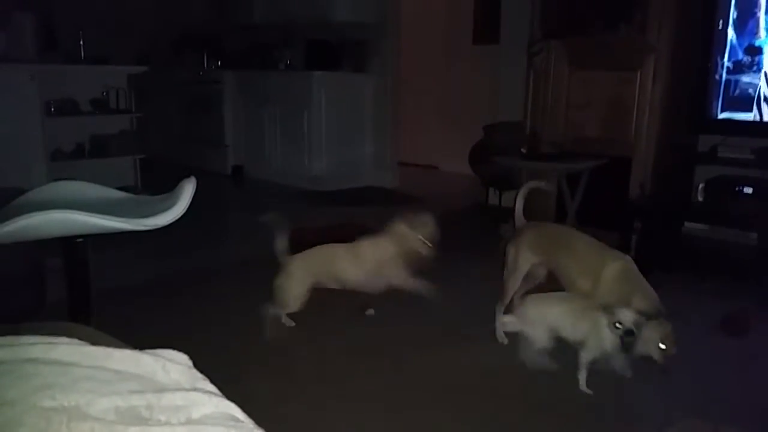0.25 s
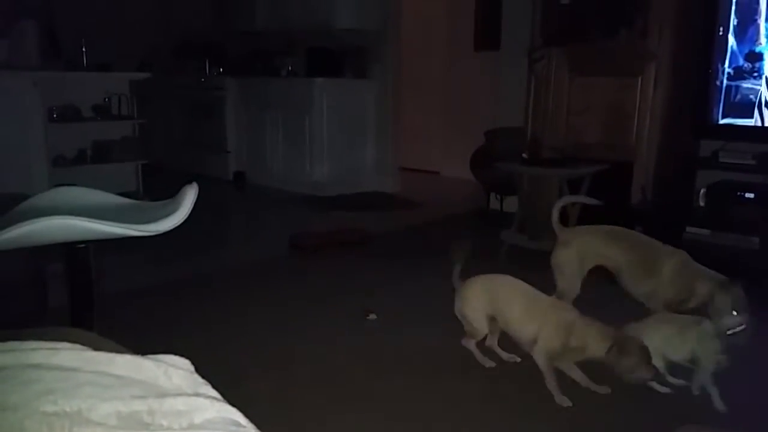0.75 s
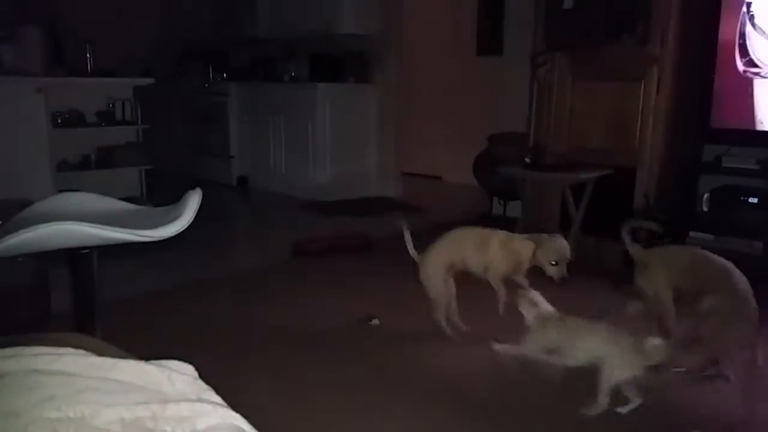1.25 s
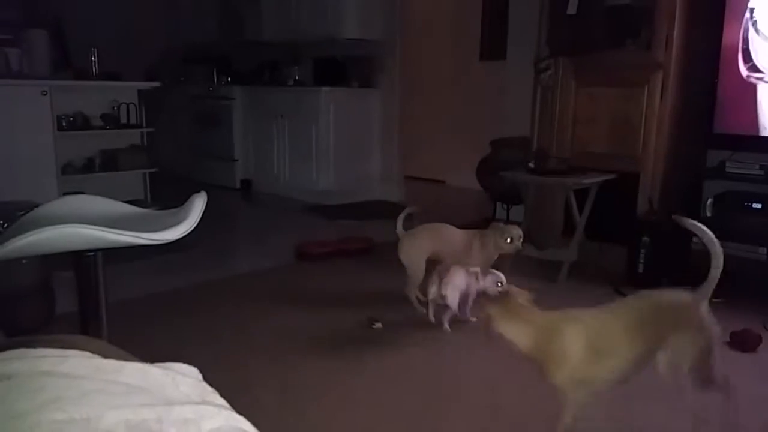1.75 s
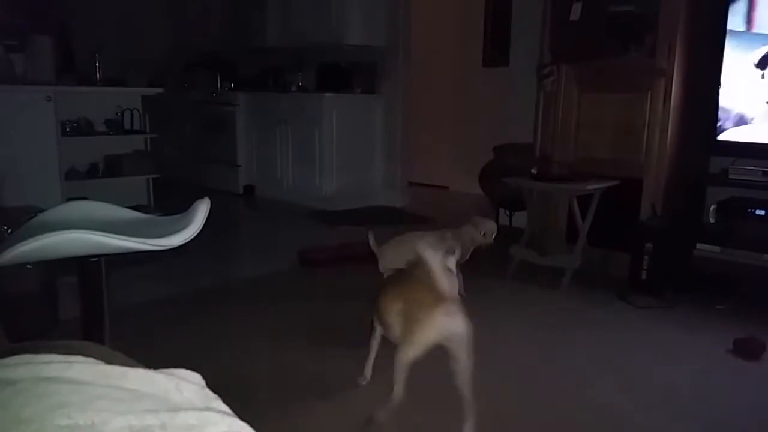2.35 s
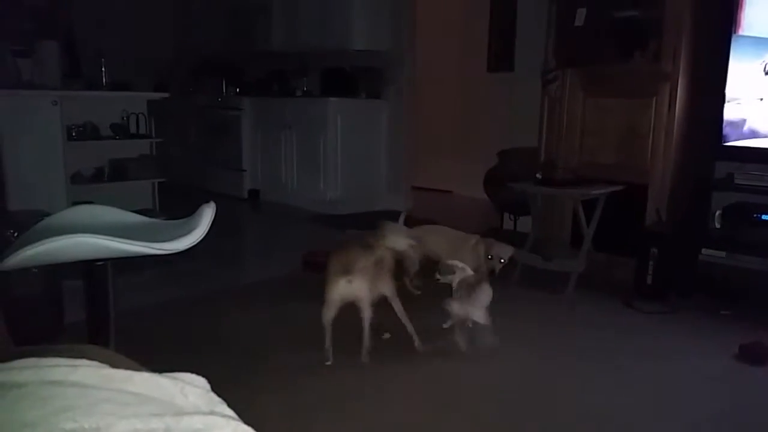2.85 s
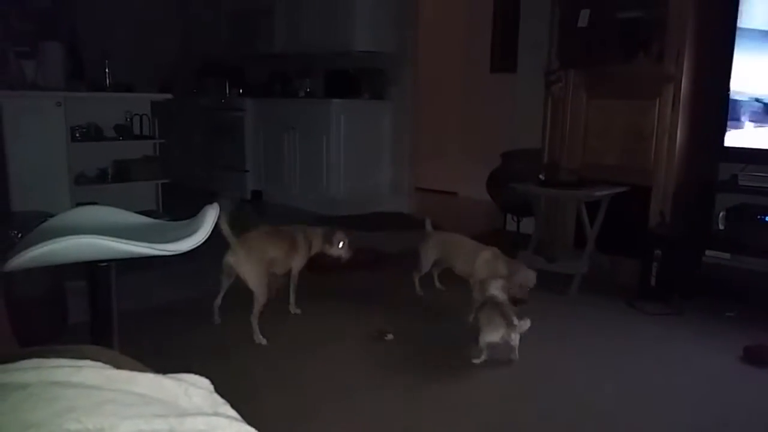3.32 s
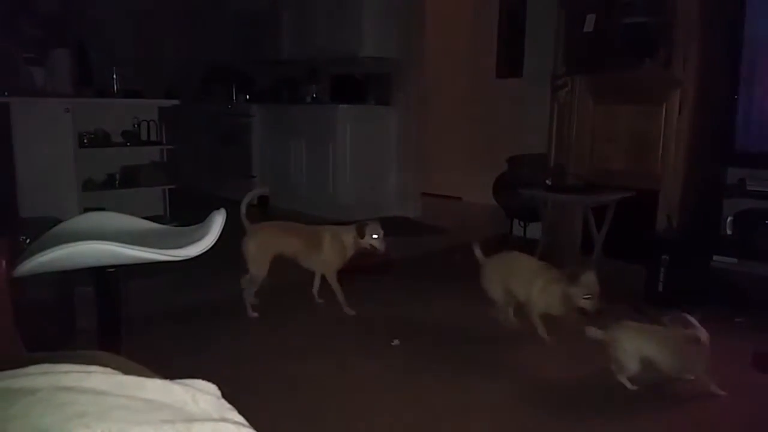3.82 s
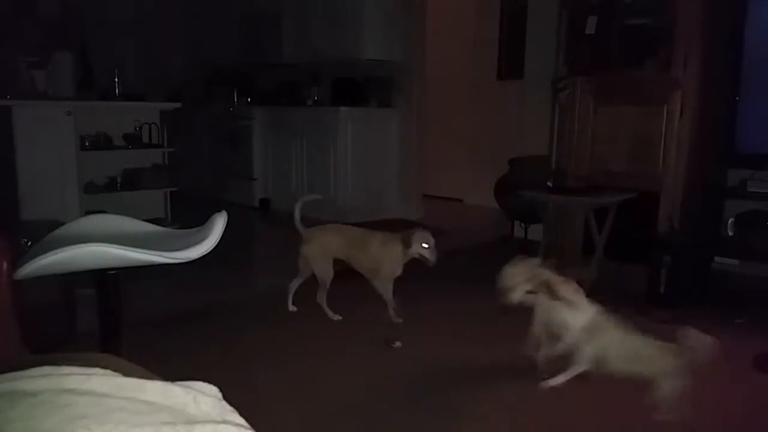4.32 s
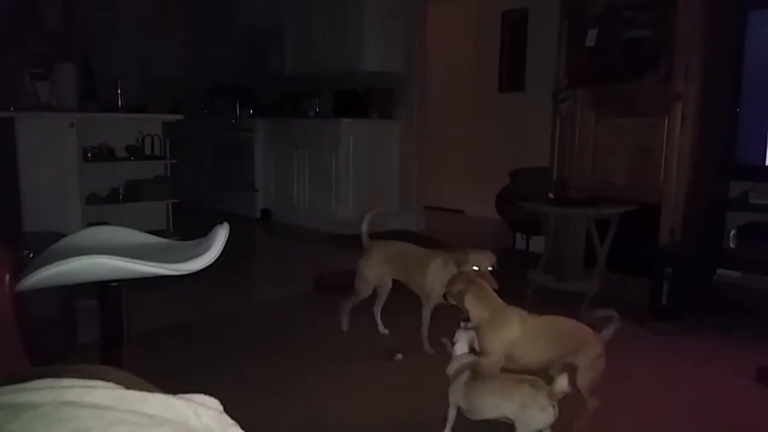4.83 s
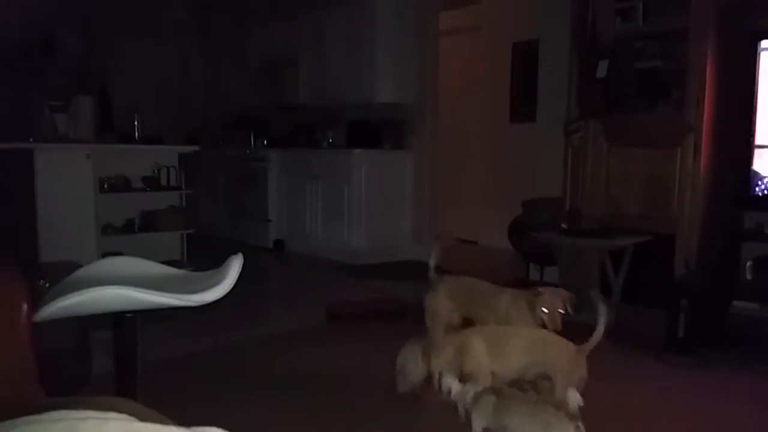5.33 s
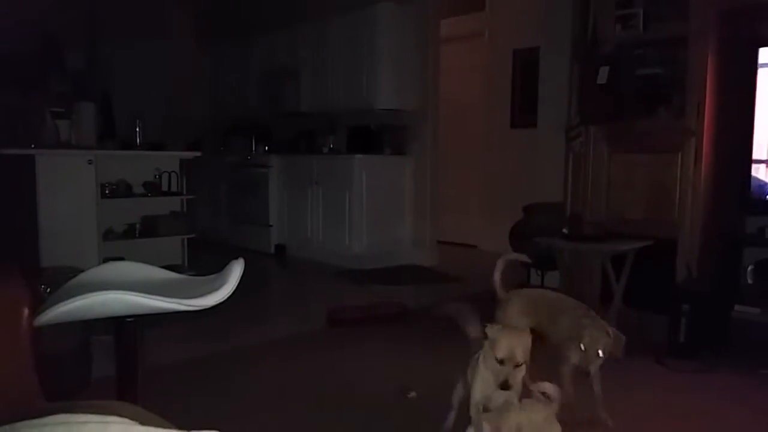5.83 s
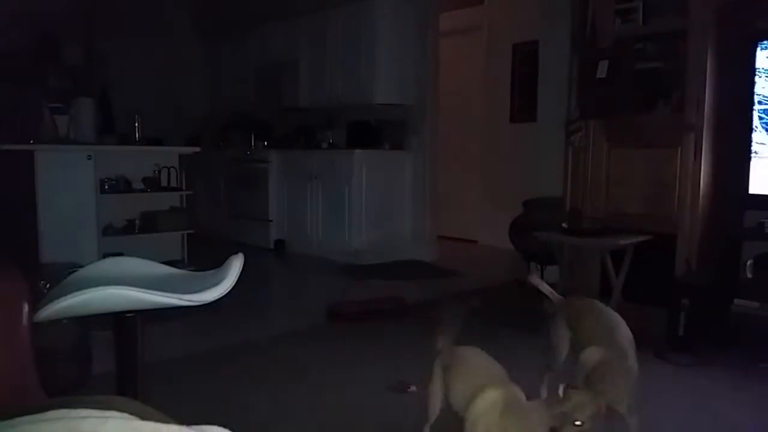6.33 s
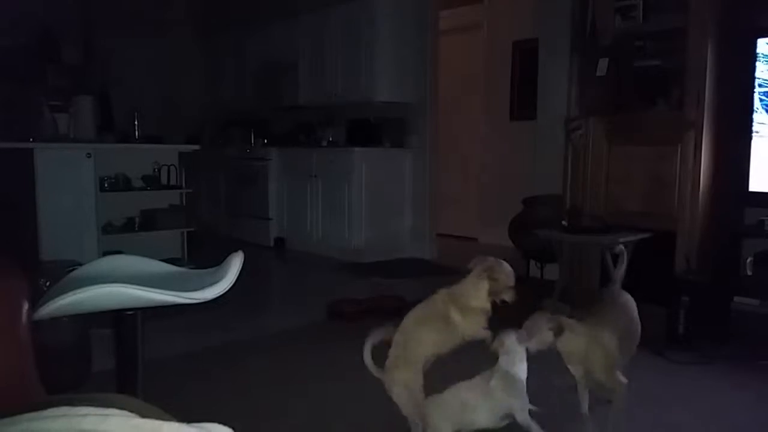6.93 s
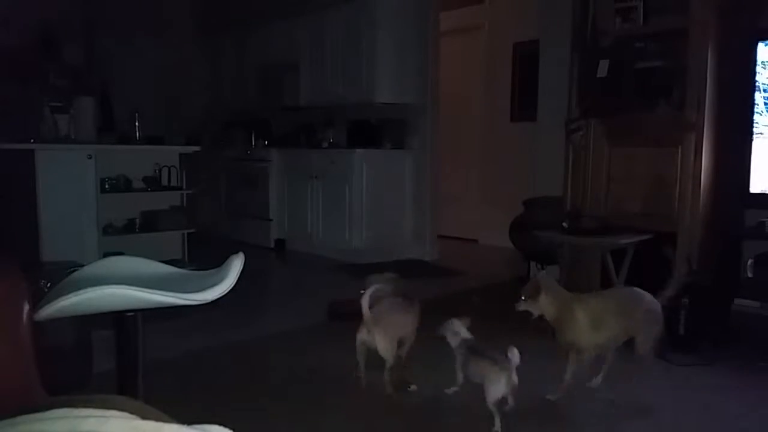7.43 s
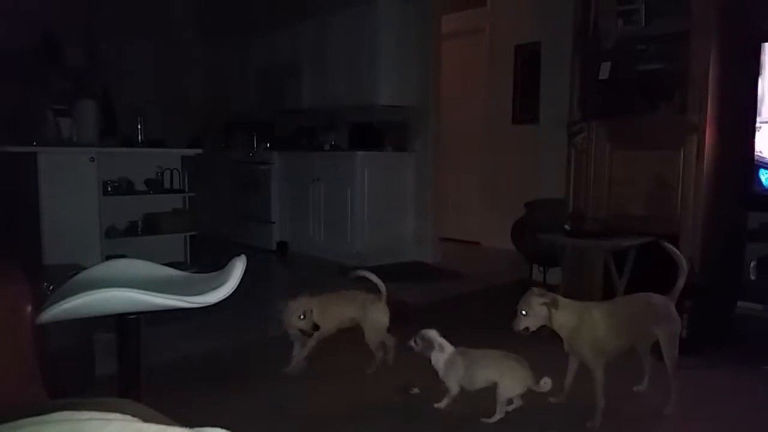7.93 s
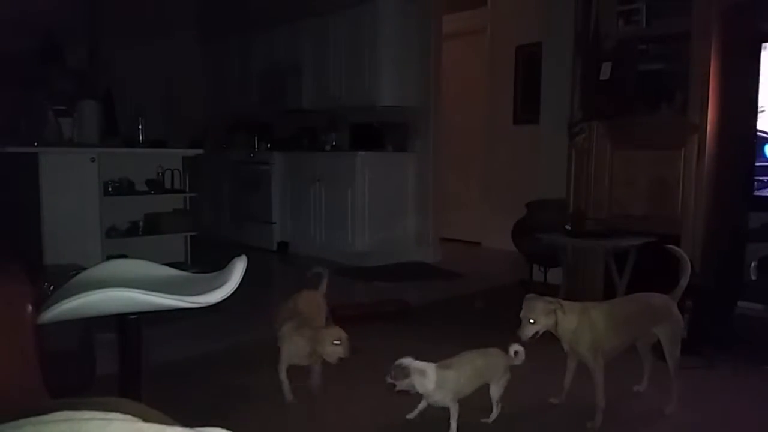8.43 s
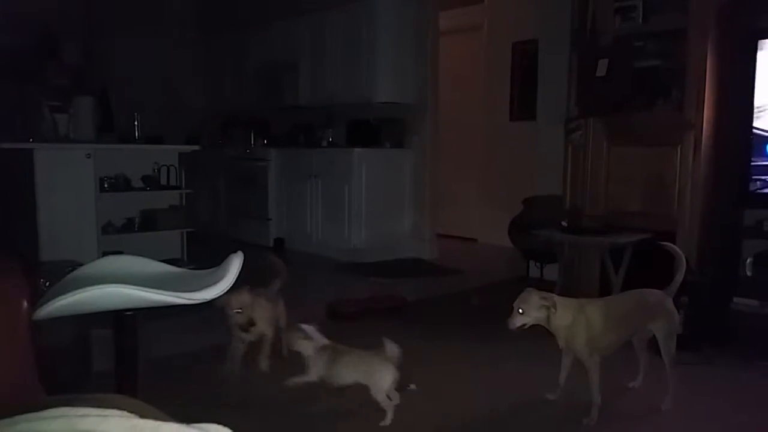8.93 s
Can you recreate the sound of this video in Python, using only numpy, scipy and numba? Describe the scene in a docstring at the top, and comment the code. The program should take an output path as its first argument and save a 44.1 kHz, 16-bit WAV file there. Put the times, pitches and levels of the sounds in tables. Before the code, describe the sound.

Dogs wrestle a few metres from a phone in a reverberant living room, slightly to its right. A sharp bark opens over quick, raspy growls; two hoarse barks come near three seconds, the second very loud. Growling grumbles, huffs and soft floor thumps follow, then a bark with a short high yelp, and a last loud bark near the end. Low room rumble throughout.

```python
"""Small dogs wrestling on a carpet

A living room with a ringing echo; the dogs play a few metres from a phone, to the right of its microphone.
Growls are uneven throat pulses plus a chest tone; hoarse barks swell from grunts, and one dog yelps.
Noise puffs make the huffs, sine tones the whines, damped knocks the thumps; ticks and squeaks come between.
The house rumbles low. The phone's gain control squeezes the loudest barks and stays low for a moment after.
"""
import sys
import numpy as np
from scipy import signal
from scipy.fft import rfft, irfft, next_fast_len
from scipy.io import wavfile
from scipy.ndimage import uniform_filter1d, minimum_filter1d
from numba import njit

SR = 44100
rng = np.random.default_rng(int(sys.argv[2]) if len(sys.argv) > 2 else 0)


def unload_audio(sound):
    """Save the sound as a 16-bit wav file, at the path given as the first command line argument."""
    columns = np.transpose(np.atleast_2d(sound))
    # keep every value between -1 and 1, then stretch to whole-number steps
    steps = np.round(np.clip(columns, -1, 1) * 32767)
    wavfile.write(sys.argv[1], SR, steps.astype(np.int16))


N = 404305
T = np.arange(N) / SR  # seconds

# All source levels are relative, ahead of room, microphone and gain control.
# Pushes of the growl. Each row: start in seconds, length in seconds, pitch in Hz, base level in dB,
# chest tone against the base in dB, mouth opening 0-1, bared teeth in dB, tongue as a factor on the mouth
# resonances, lips as a factor on the teeth resonances, rasp 0-1.
GROWLS = [(0.0, 0.039, 171.2, -35, -1.5, .8, -35, 1, 0.72, 1),
          (.05, 0.18, 163.3, -39.5, -2.5, 0.9, -25, .98, 0.97, .4),
          (.264, 0.099, 168, -38, -4, 0.79, -30.5, 1.2, 1, 0.26),
          (.375, 0.076, 168, -34.5, -1, 0.49, -38.5, 0.95, 1.43, 0.2),
          (.445, 0.044, 171.4, -35.5, -4, 0.61, -30, 1.05, 0.8, 0.6),
          (.5, .1, 165, -37, 2, 0.34, -46, 1.17, 1.5, 0.6),
          (.61, 0.054, 164.4, -37.5, -8, 0.76, -33, 1.12, 0.99, 0.3),
          (0.656, .105, 168, -35, 1, 0.92, -28, 1.05, 1.03, .5),
          (.765, 0.089, 180, -26.5, -7.5, 0.75, -22.5, 0.95, 1.03, 0.41),
          (.823, 0.086, 197.8, -26.5, -1, 0.95, -33, 1.127, 1, 0.78),
          (.905, 0.1, 172.2, -44, -6, .92, -46, 0.8, 0.79, .3),
          (1.083, 0.069, 144.6, -35, 4.5, 0.73, -30.5, 1.17, 1.08, 0),
          (1.194, 0.076, 142.9, -37, 1, 0.33, -44, 1.44, 1.4, 0.82),
          (1.459, 0.06, 141.2, -36.5, -2, 0.75, -33, 1.01, 1.3, 0.66),
          (1.501, .13, 140.8, -32.5, 4.5, 0.35, -39.5, 0.95, 1.4, 0.94),
          (1.634, 0.098, 134.9, -33, -5.5, 0.15, -36, 1.08, 1.39, 0.37),
          (2.54, 0.18, 118.1, -38.5, -3.5, 0.1, -46, 0.92, 1.34, 0.76),
          (3.458, 0.18, 136.7, -35, -5.5, 0, -59, 0.84, 1.3, 0.47),
          (4.096, 0.17, 138.3, -45.5, .5, 0.5, -46.5, 1.23, 1.3, 0.35),
          (4.225, 0.15, 150.5, -47.5, 8, 0.8, -44, 1.04, 1.23, 0.14),
          (4.345, .11, 157.3, -41, 1.5, 0.9, -44, 1.135, 1.36, 0.07),
          (4.48, 0.11, 154.2, -36, 5, 0.43, -63, 1.21, 1.1, 0.29),
          (4.614, .13, 171, -30, -2.5, 0.19, -45, 1.11, 1.2, 0.3),
          (5.075, .14, 160.6, -37.5, 6.5, 0.64, -35, 1.2, 1.12, 0.74),
          (5.21, .16, 166.5, -36, 3, 0.47, -35.5, 1.204, 1.054, .9),
          (5.331, 0.096, 172.4, -32, 1.5, 0.42, -35, 1.18, 1.3, 0.91),
          (5.421, 0.093, 168.3, -30, 2.5, 0.17, -36.5, 1.1, 1.28, 0.97),
          (5.526, 0.1, 153, -37, 1, 0.32, -46, 1.27, 1.43, 0.83),
          (6.432, 0.044, 144.2, -35, 1, 0.24, -44, 1.05, 0.92, 0.76),
          (6.543, 0.15, 165.4, -37.5, 0, 0.28, -37.5, 1.01, 1.34, 0.69),
          (6.676, 0.11, 163.1, -32, 0, 0.13, -36.5, 0.96, 1.14, 0.51),
          (6.942, 0.05, 164, -29, -5, 0.62, -35, .92, 1.8, 0.4),
          (6.997, 0.19, 153.1, -36.5, 7, 0.23, -61, .974, 0.78, 0),
          (7.231, 0.059, 122.2, -32.5, -7.5, 0.2, -41, 0.99, 0.82, 0.6),
          (7.453, .17, 152.8, -32.5, 1.5, 0.15, -42, 1.08, 1.28, 0.48),
          (7.654, 0.07, 122.6, -42.5, -2, 0.23, -50, 0.98, 1.07, 0.55),
          (9, 0.2, 141, -38, -1.5, 0.35, -44.5, 0.92, 1.06, .4)]
# Barks. Each row: time in seconds (the grunt leads it), length in seconds, level in dB, pitch in Hz and jaw
# resonance in Hz with the jaw wide open, teeth in dB, lips as a factor on the teeth resonances,
# opening grunt against the bark in dB, roughness 0-1, escaping air in dB.
BARKS = [(0.035, 0.049, -2.5, 454.8, 970, -6, 0.94, -20.5, 0.87, -35.5),
         (0.067, 0.044, -14, 342.6, 1050, 6, 0.84, -26, 0.73, -52),
         (2.746, 0.1, -9.5, 287.6, 840, -2, 1.035, -13.5, 0.84, -41),
         (3.135, 0.077, 5, 336.3, 1075, 5.5, 1.028, -26, 0.84, -21),
         (6.812, 0.049, -9, 467.7, 940, -9, 0.913, -22, 0.5, -53.5),
         (8.5, 0.072, -0.5, 334.4, 1040, 8.5, 0.96, -23, .8, -30)]
# Jaw during a bark. Each row: seconds after the grunt begins, opening 0-1.
BARK_JAW = [(0, 0.38), (.038, 0.86), (.072, 0.97), (.092, 0.42), (.115, 0), (.16, 0.27)]
# Course of the yelp. Each row: time in seconds, pitch in Hz, level in dB, hoarseness 0-1.
YELP = [(6.824, 520, -23.5, 0.92), (6.851, 528.7, -13, 0.87), (6.872, 532.2, -16, 0.07),
        (6.896, 552.6, -9.5, 0.01), (6.917, 538.2, -12, .04), (6.933, 524, -14, 0.01),
        (6.955, 505, -20, 0.5)]
# Two whines through the nose, then two faint hums. Each row: start in seconds, length in seconds,
# level in dB, pitch in Hz, pitch bend as a share, third harmonic against the first in dB.
SOFT_TONES = [(0.241, 0.11, -34.5, 336, 0.051, -32), (4.887, 0.16, -43.5, 508, 0.079, -15),
              (7.556, 0.46, -43, 296.5, 0.00048, -32.5), (8.164, 0.23, -58, 294.4, 0.0026, -43)]
# Air squeaking through the teeth. Each row: start in seconds, length in seconds, resonance in Hz, level in dB.
SQUEAKS = [(0.617, 0.15, 2910, -35), (1.233, 0.033, 2570, -30.5), (1.264, 0.032, 2500, -36),
           (4.202, 0.2, 2270, -42.5), (4.558, 0.025, 2600, -29.5), (4.605, .14, 2210, -38.5),
           (5.278, 0.32, 2630, -41.5)]
# Voiceless puffs from the muzzles. Each row: peak in seconds, half width in seconds, hiss in dB, throat in dB.
HUFFS = [(0.47, 0.019, -61, -51), (1.268, 0.07, -49.5, -38), (1.618, 0.033, -51.5, -40.5),
         (1.75, 0.11, -51.5, -38.5), (2.083, 0.042, -46, -45), (3.52, .03, -57.5, -61),
         (4.572, 0.11, -49, -38.5), (5.778, 0.043, -53.5, -43), (6.264, 0.054, -61, -84),
         (6.592, 0.094, -49.5, -37), (7.03, 0.12, -75, -45.5), (7.305, 0.052, -58, -36),
         (7.822, 0.014, -61.5, -39), (7.9, 0.096, -55.5, -45.5)]
# Teeth and claws ticking. Each row: start in seconds, level in dB, ring of the jaws in dB.
TICKS = [(.241, -43, -25), (0.601, -44, -26), (4.568, -30, 4), (5.402, -47, 0), (5.425, -42.5, 3),
         (5.783, -39.5, 8), (7.803, -37, 14)]
# Paws and bumps on the floor. Each row: start in seconds, peak level in dB, contact time in seconds.
THUMPS = [(1.75, -31.5, 0.0028), (2.532, -39.5, 0.0008), (4.961, -29.5, .0013), (5.807, -34, 0.0033),
          (5.879, -30, 0.0024), (5.937, -31.5, 0.0011), (5.968, -46.5, .003), (6.011, -50, 0.0041),
          (6.086, -37, .0025), (6.22, -27.5, 0.0012), (6.303, -34.5, 0.0021)]
# Resonances of the muzzle, the last set for a bark. Each row: centre in Hz, width in Hz, level in dB.
THROAT_MODES = [(219.5, 87, 7), (350, 150, -6.5), (394, 58, -1.5)]
MOUTH_MODES = [(614, 165, -3), (780, 220, -2), (983, 172, 4.5), (1206, 480, -11.5)]
TEETH_MODES = [(1500, 400, -14.5), (1830, 280, 8.5), (2170, 620, -6), (2700, 380, -3.5), (3820, 130, -18.5)]
BARK_TEETH_MODES = [(1520, 320, -1), (1974, 280, 11.5), (2440, 460, 3), (2735, 336, 2), (3845, 720, -15),
                    (5500, 1800, -22)]
# Colour of the cry, of air at teeth and nostrils, of air in the throat, and of the house.
# Each row: frequency in Hz, gain in dB.
YELP_COLOUR = [(150, -45), (540, -15.5), (1080, -8), (1630, -1), (2170, -10), (2720, -10.5), (3300, -21),
               (3800, -29.5), (4300, -74), (9000, -59)]
HISS_COLOUR = [(1500, -17), (4000, -2), (6000, -2.5), (8000, -14.5), (10000, -1.5), (13000, -1),
               (15000, -15)]
THROAT_AIR_COLOUR = [(150, -16), (500, -5), (1000, -6.5), (2200, -3), (3000, -9.5), (4200, -13),
                     (6500, -25.5), (10000, -52)]
HUM_COLOUR = [(20, -29.5), (50, -22.5), (100, -4.5), (160, -10.5), (330, -7), (480, -17), (800, -21.5),
              (1500, -30.5), (2200, -21), (3000, -38.5), (4000, -23.5), (6000, -42.5), (12000, -44)]
# Reverberation of the room. Each row: frequency in Hz, time to fall by 60 dB in seconds.
ROOM_T60 = [(100, 0.4), (400, 0.77), (900, 0.7), (2500, 0.69), (6000, 0.66), (12000, 0.32)]
# Echo against direct sound. Each row: frequency in Hz, level in dB.
ROOM_WET = [(100, -28), (200, -7.5), (400, -7.5), (800, 5.5), (1500, 3.5), (5000, 7), (13000, 15.5)]
# Lean of the stereo picture, split between the ports in scene(). Each row: frequency in Hz, left over right in dB.
LEAN = [(30, -1.5), (70, -6), (140, -2.5), (280, -4.5), (600, -7.5), (1200, -7.5), (2500, -5.5), (4500, -7),
        (8000, -28.5), (12500, 1)]
# A dip in the treble. Each row: frequency in Hz, gain in dB.
TREBLE_DIP = [(20, 5.5), (6000, -5), (7200, -6), (8200, -13.5), (9500, 2.5), (20000, 12.5)]

# Growl
GROWL_ATTACK_SHARE, SHORTEST_ATTACK_S = 0.12, .022  # a long push builds up more slowly
GROWL_RELEASE_S, CHEST_RELEASE_S = 0.037, 0.041  # the chest tone lingers into the next push
PITCH_ARCH, SAG_HZ_PER_S = .05, 50  # pitch rises with the push and sinks as the breath runs out
MOUTH_SHUT_DB, MOUTH_OPEN_DB = -6, 15  # mouth resonances against the base level
GROWL_HISS_DB, GROWL_RUSH_DB = -32, -25  # drive of the escaping air against the mouth
FLAP_HZ, FLAP_DB = 35.6, 1.63  # mean rate and least swing of flapping lips and soft palate
# A rasping push damps the resonances, flaps harder and lets more air rush through the throat.
RASP_WIDEN, RASP_FLAP_DB, RASP_RUSH_DB = 0.7, 1, 6.5
# Mouth sound glides from this level to its full gain; after a pause it starts weaker and takes longer.
MOUTH_GLIDE_S, MOUTH_START_DB = 0.039, 1
PAUSE_S, FIRST_GLIDE_S, FIRST_START_DB = .05, 0.076, -15

# Bark
BARK_LEAD_S = .033  # the grunt begins ahead of the listed time
BARK_ATTACK_S, BARK_RELEASE_S, BARK_PUSH_POWER = 0.087, 0.025, 1.99  # the power also shortens the release
BARK_RASP_HZ, BARK_RASP_DB = 74.64, 6.5  # mean rate and swing of the flapping throat
BARK_RUSH_DB = -7.5  # rush in the throat against the hiss
BARK_SHUT_PITCH = .8  # share of the open pitch when the jaw is shut

SHUT_STRETCH = 0.794  # factor on the muzzle resonances when the jaw is shut
SQUEAK_WIDTH_HZ = 410
YELP_DIRECT_DB = -8.5  # the yelping dog faces the phone: more of its cry arrives without echo
HUM_DB = -47  # mean level ahead of the microphone
PORT_LAG_S = .00007  # the sound reaches the left port later
TOP_HZ = 14600  # steep cut above this


def growls():
    """A nearly pure chest tone; flapping folds ring the throat, and the mouth as it opens and lets air out."""
    out, t, last_end = np.zeros(N), np.arange(SR // 2) / SR, 0
    for start, length, hz, db, chest_db, opening, teeth_db, tongue, lips, rasp in GROWLS:
        along = np.clip(t / length, 0, 1)
        arch = 1 + PITCH_ARCH * (np.sin(np.pi * along) - 2 / np.pi)
        pitch = hz * arch - SAG_HZ_PER_S * length * (along - .5)
        buzz, phase = folds(pitch, jitter=.025 + .03 * rasp, shimmer_db=1.7 + 2 * rasp, air_share=.25)

        flap_hz = FLAP_HZ * (1 + .3 * wander(30, len(t)))
        flap = np.sin(2 * np.pi * np.cumsum(flap_hz) / SR)
        flutter = unit(undb((FLAP_DB + RASP_FLAP_DB * rasp) * flap))
        tone = unit(np.sin(2 * np.pi * phase) * undb(1.8 * wander(35, len(t))))

        # the jaw opens with each push and shifts as the dog mouths its playmate
        jaw = 0.26 + 0.42 * opening + .4 * np.sin(np.pi * along) + 0.21 * wander(16, len(t))
        mouth_gain = undb(db + MOUTH_SHUT_DB + (MOUTH_OPEN_DB - MOUTH_SHUT_DB) * opening)
        glide_s, start_db = MOUTH_GLIDE_S, MOUTH_START_DB
        if start - last_end > PAUSE_S:
            glide_s, start_db = FIRST_GLIDE_S, FIRST_START_DB
        glide = undb(start_db * np.clip(1 - t / glide_s, 0, 1))
        last_end = start + length

        widen = 1 + RASP_WIDEN * max(rasp, 0)
        throat = undb(db - 0.5) * unit(resonate(buzz, THROAT_MODES))
        mouth = mouth_gain * muzzle(buzz, MOUTH_MODES, jaw, tongue, np.sqrt(widen))
        teeth = undb(teeth_db - 2) * muzzle(buzz, TEETH_MODES, jaw, lips, widen)

        attack_s = max(GROWL_ATTACK_SHARE * length, SHORTEST_ATTACK_S)
        push = swell(t, attack_s, length, GROWL_RELEASE_S)
        rush = undb(GROWL_RUSH_DB + RASP_RUSH_DB * rasp) * push
        breath = mouth_gain * air(undb(GROWL_HISS_DB) * push, rush)
        chest = undb(db + chest_db + 2.95) * tone * swell(t, attack_s, length, CHEST_RELEASE_S)
        voice = push * flutter * (throat + glide * (mouth + teeth))
        add(out, start, chest + voice + glide * breath)
    return out


def barks():
    """A low grunt swells into a hoarse, rasping blast; pitch and resonances follow the jaw open and shut."""
    out, t = np.zeros(N), np.arange(SR // 3) / SR
    for start, length, db, hz, jaw_hz, teeth_db, lips, grunt_db, rough, air_db in BARKS:
        opening = np.interp(t, *np.transpose(BARK_JAW))
        pitch = hz * (BARK_SHUT_PITCH + (1 - BARK_SHUT_PITCH) * opening)
        buzz, _ = folds(pitch, jitter=.06 * rough, shimmer_db=4.5 * rough, air_share=.4 * rough)
        rasp_hz = BARK_RASP_HZ * (1 + 0.31 * wander(83.7, len(t)))
        buzz = buzz * undb(BARK_RASP_DB * np.sin(2 * np.pi * np.cumsum(rasp_hz) / SR))

        jaw = muzzle(buzz, [(jaw_hz, 120 + 190 * rough, 0)], opening)
        teeth = muzzle(buzz, BARK_TEETH_MODES, opening, lips) * undb(teeth_db)
        push = swell(t, BARK_ATTACK_S, BARK_LEAD_S + length, BARK_RELEASE_S) ** BARK_PUSH_POWER
        blast = (jaw - teeth * (0.18 + 0.59 * push)) * push  # brighter with effort
        breath = undb(air_db) * air(push, undb(BARK_RUSH_DB) * push)

        low, _ = folds(165 + 60 * opening, jitter=0.18, shimmer_db=1.0, air_share=0.17)
        grunt = unit(resonate(low, [(152, 79, 1.0), (274, 100, 1.8), (880, 900, -1.5)]))
        grunt = grunt * swell(t, 0.029, length * 1.2, 0.068)
        add(out, start - BARK_LEAD_S, undb(db) * (blast + undb(grunt_db) * grunt) + breath)
    return out


def yelp():
    """A high cry that starts as a hoarse screech, clears on a shallow arch of pitch and frays again."""
    s, hz, db, hoarse = np.transpose(YELP)
    hoarse = np.interp(T, s, hoarse)
    buzz, _ = folds(np.interp(T, s, hz), jitter=.007 + .04 * hoarse, shimmer_db=2, air_share=hoarse)
    level_db = np.interp(T, s, db, left=-200, right=-200)  # silent outside the cry
    return unit(colour(buzz, YELP_COLOUR)) * undb(level_db)


def soft_tones():
    """Thin, nearly pure tones with a rounded level and a slightly wavering pitch."""
    out = np.zeros(N)
    for start, length, db, hz, bend, third_db in SOFT_TONES:
        arch = np.sin(np.linspace(0, np.pi, int(length * SR)))
        pitch = hz * (1 + bend * (arch - .5 + 0.79 * wander(50, len(arch))))
        phase = 2 * np.pi * np.cumsum(pitch) / SR
        tone = np.sin(phase) + 0.047 * np.sin(2 * phase) + undb(third_db) * np.sin(3 * phase)
        add(out, start, undb(db) * np.sqrt(2 * np.abs(arch)) * tone)
    return out


def squeaks():
    """Air forced through the teeth rings one broad resonance for a moment."""
    out = np.zeros(N)
    for start, length, hz, db in SQUEAKS:
        puff = np.hanning(int(length * SR))
        ring = unit(resonate(rng.standard_normal(len(puff)), [(hz, SQUEAK_WIDTH_HZ, 0)]))
        add(out, start, undb(db) * puff * ring)
    return out


def huffs():
    """Short, rounded puffs of air from the muzzles."""
    hiss, throat = np.zeros(N), np.zeros(N)
    for peak, width, hiss_db, throat_db in HUFFS:
        puff = np.hanning(int(4 * width * SR))
        start = peak - len(puff) / SR / 2
        add(hiss, start, undb(hiss_db) * puff)
        add(throat, start, undb(throat_db) * puff)
    return air(hiss, throat)


def ticks():
    """Short, bright noise snaps; those of the teeth also ring the jaws."""
    out, t = np.zeros(N), np.arange(SR // 50) / SR
    for start, db, ring_db in TICKS:
        click = rng.standard_normal(len(t)) * np.exp(-t / 0.0013)
        snap = resonate(click, [(2200, 610, ring_db), (4840, 9100, -39), (12800, 3500, -5)])
        add(out, start, undb(db) * snap / np.abs(snap).max())
    return out


def thumps():
    """Dull, heavily damped knocks of the floor; a soft paw pushes for longer and sounds duller."""
    out, t = np.zeros(N), np.arange(SR // 16) / SR
    for start, db, contact_s in THUMPS:
        push = -np.sin(np.pi * np.clip(t / contact_s, 0, 1)) ** 2
        knock = resonate(push, [(130, 143, 9.0), (293, 800, -7), (900, 1400, -5)])
        add(out, start, undb(db) * knock / np.abs(knock).max())
    return out


def room(x):
    """Direct sound, dense early echoes from floor and furniture, and a tail that differs at each port."""
    t = np.arange(int(.8 * SR)) / SR
    hz = np.fft.rfftfreq(len(t), 1 / SR)
    noise, echo = rfft(rng.standard_normal((2, len(t)))), 0
    for k, (_, t60) in enumerate(ROOM_T60):
        # each band fades out towards its neighbours
        band = on_log_axis([(f, j == k) for j, (f, _) in enumerate(ROOM_T60)], hz)
        tail, early = np.exp(-np.log(1000) * t / t60), 5.53 * np.exp(-t / 0.0035)
        decay = (tail + early) * (t > .002)
        echo = echo + irfft(noise * band, len(t)) * decay / np.sqrt(np.sum(decay ** 2))
    wet = signal.fftconvolve(colour(x, ROOM_WET)[None], echo, axes=1)[:, :N]
    # take back the colour that the added echo energy gives
    total = [(f, 10 * np.log10(1 + undb(db) ** 2)) for f, db in ROOM_WET]
    return colour(x + wet, total, power=-1.043)


def hum():
    """Low rumble of the house, largely shared by both ports, with a faint hiss of its own at each."""
    shared = colour(rng.standard_normal(N), [(100, 5.5), (400, 3.0), (1500, -15.5)])
    both = unit(colour(shared + rng.standard_normal((2, N)), HUM_COLOUR))
    return undb(HUM_DB + 0.42 * wander(30, N)) * both


def folds(hz, jitter, shimmer_db, air_share):
    """Vocal folds: uneven pulses, each followed by a puff of turbulence; also gives the phase in cycles."""
    size = len(hz)
    phase = np.cumsum(hz * (1 + jitter * wander(220, size))) / SR
    pulses = np.diff(np.floor(phase), prepend=0) * undb(shimmer_db * wander(170, size))
    puffs = rng.standard_normal(size) * np.exp(-(phase % 1) / 0.39)
    air_share = np.clip(air_share, 0, 1)
    return np.sqrt(1 - air_share) * unit(pulses) + np.sqrt(air_share) * unit(puffs), phase


def muzzle(x, modes, opening, shape=1, widen=1):
    """Resonances glide up as the jaw opens from 0 to 1; tongue or lips (shape) shift them, widen damps them."""
    damped = [(hz, width * widen, db) for hz, width, db in modes]
    stretch = SHUT_STRETCH + (1 - SHUT_STRETCH) * np.clip(opening, 0, 1)
    return unit(resonate(x, damped, stretch=shape * stretch))


def air(hiss, throat):
    """Air hisses through teeth and nostrils and rushes in the throat, each with its own envelope."""
    size = len(hiss)
    hissing = hiss * unit(colour(rng.standard_normal(size), HISS_COLOUR))
    rushing = throat * unit(colour(rng.standard_normal(size), THROAT_AIR_COLOUR))
    return undb(1.0 + 0.4 * wander(70, size)) * (hissing + rushing)


def resonate(x, modes, stretch=1):
    """Parallel resonances of alternating sign, each applied twice for steep skirts; stretch moves them all."""
    out = 0
    for k, (hz, width, db) in enumerate(modes):
        centre = hz * stretch * np.ones(len(x))
        once = band_pass(x, centre, float(width))
        out = out + (-1) ** k * undb(db) * band_pass(once, centre, float(width))
    return out


@njit
def band_pass(x, hz, width):
    """One resonance, a state-variable filter whose centre may move from sample to sample."""
    y, band, low = np.empty(len(x)), 0., 0.
    for i in range(len(x)):
        g, k = np.tan(np.pi * min(hz[i], .45 * SR) / SR), width / hz[i]
        v = (band + g * (x[i] + 1e-18 - low)) / (1 + g * (g + k))
        band, low, y[i] = 2 * v - band, low + 2 * g * v, k * v
    return y


def colour(x, points, power=1):
    """Filter by a (Hz, dB) spectrum, its dB values scaled by power."""
    size = next_fast_len(x.shape[-1] + 4096)
    gain = undb(power * on_log_axis(points, np.fft.rfftfreq(size, 1 / SR)))
    return irfft(rfft(x, size) * gain, size)[..., :x.shape[-1]]


def on_log_axis(points, hz):
    """Read (Hz, value) points at any frequency."""
    f, value = np.transpose(points)
    return np.interp(np.log(np.maximum(hz, 1)), np.log(f), value)


def wander(rate, size):
    """Smooth chance with a spread near 1, drawn anew rate times a second."""
    steps = np.arange(size) * rate / SR
    return 1.2 * np.interp(steps, np.arange(8192), rng.standard_normal(8192))


def swell(t, rise, length, fall):
    """Rounded attack, hold, then an exponential release from length onwards."""
    attack = np.sin(np.pi / 2 * np.clip(t / rise, 0, 1)) ** 2
    return attack * np.exp(-np.maximum(t - length, 0) / fall)


def undb(db):
    """Decibels to gain."""
    return np.exp(np.asarray(db) * (np.log(10) / 20))


def unit(x):
    """Scale to rms 1."""
    return x / np.sqrt(np.mean(x ** 2))


def add(track, start, sound):
    """Mix a sound in at a time in seconds."""
    i = max(int(start * SR), 0)
    track[i:i + len(sound)] += sound[:max(N - i, 0)]


def scene():
    """The dogs play to the right of the phone; floor knocks arrive without echo."""
    snaps, cry = ticks(), yelp()
    voices = growls() + barks() + 0.82 * cry + soft_tones()
    echoing = room(voices + huffs() + squeaks() + 0.62 * snaps)
    both = echoing + 0.64 * snaps + undb(YELP_DIRECT_DB) * cry + thumps()
    left, right = colour(both[0], LEAN, power=0.72), colour(both[1], LEAN, power=-0.25)
    return np.array([np.roll(left, round(PORT_LAG_S * SR)), right]) + hum()


def gain_control(x, ceiling_db, ratio, slack_db, held_share, hold_s):
    """Squeeze what passes the ceiling; a share of any cut deeper than the slack is held for a while."""
    power = uniform_filter1d(np.mean(x ** 2, axis=0), size=600)
    over_db = np.minimum(ceiling_db - 10 * np.log10(np.maximum(power, 1e-12)), 0)  # negative above the ceiling
    cut_db = over_db * (1 - 1 / max(ratio, 1))
    half = int(hold_s * SR / 2)
    # the origin turns the window towards the past
    deepest_db = minimum_filter1d(cut_db, 2 * half + 1, origin=half, mode="constant")
    held_db = np.clip(held_share, 0, 1) * np.minimum(deepest_db + slack_db, 0)
    return x * undb(uniform_filter1d(np.minimum(cut_db, held_db), size=300))


def record(dry):
    """A dip in the treble, gain control and a steep cut at the top."""
    heard = colour(dry, TREBLE_DIP)
    squeezed = gain_control(heard, ceiling_db=-14.0, ratio=23, slack_db=8.5, held_share=1.0, hold_s=0.87)
    return signal.sosfilt(signal.ellip(10, .2, 80, TOP_HZ, fs=SR, output="sos"), squeezed)


dry = scene()
out = record(dry)
unload_audio(out)
```